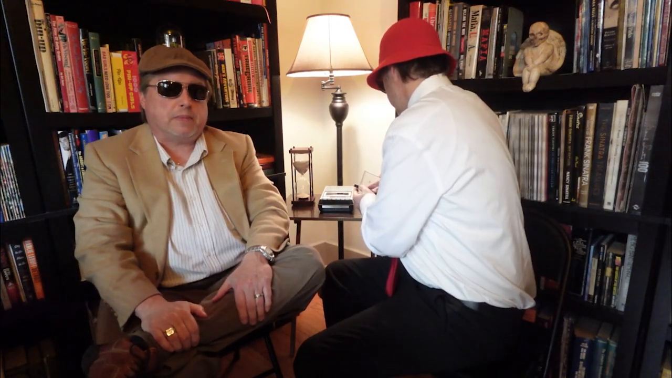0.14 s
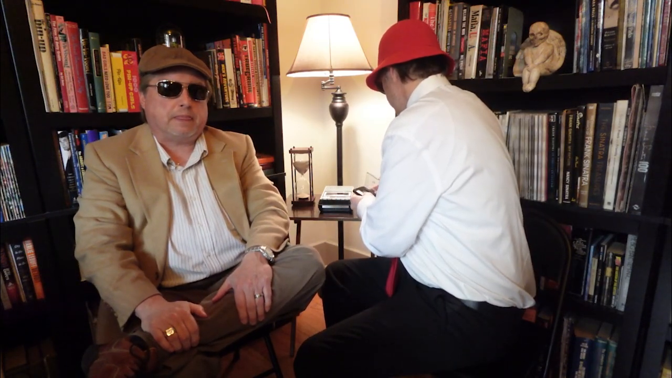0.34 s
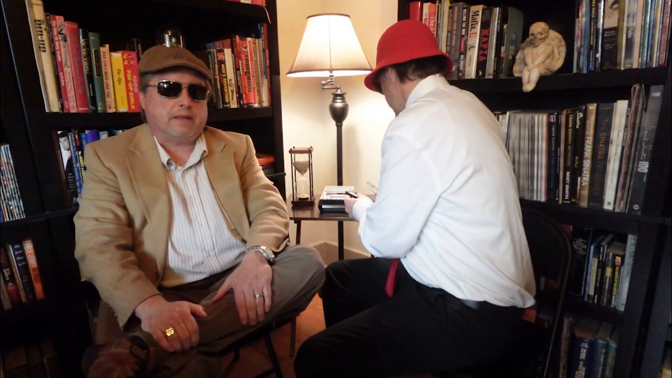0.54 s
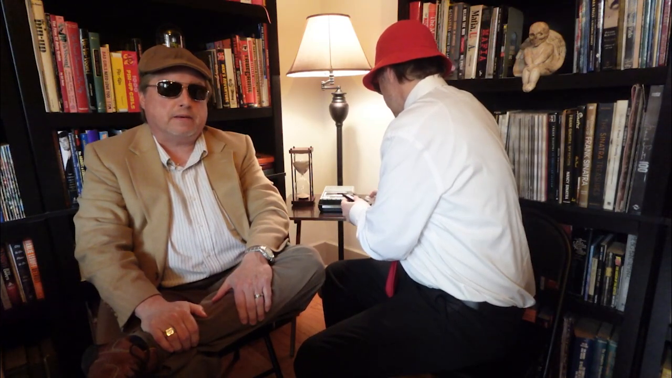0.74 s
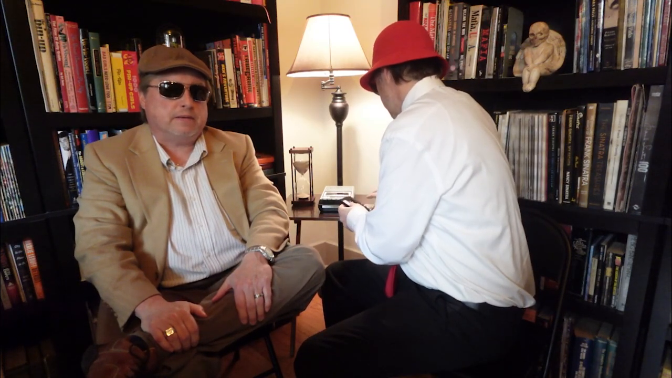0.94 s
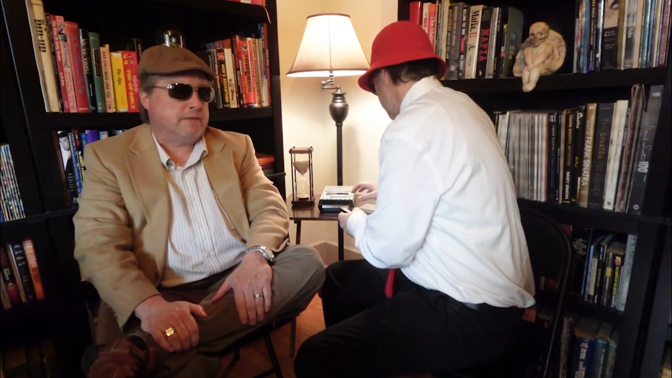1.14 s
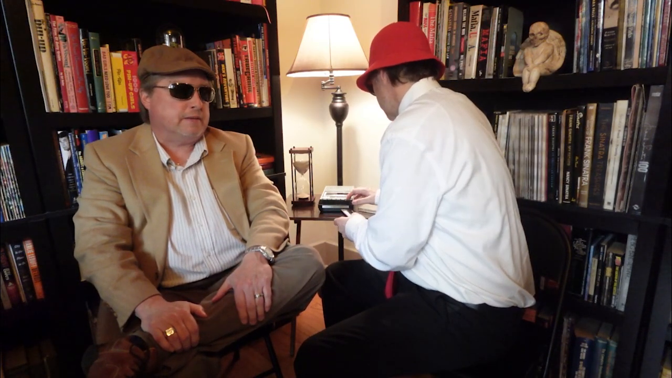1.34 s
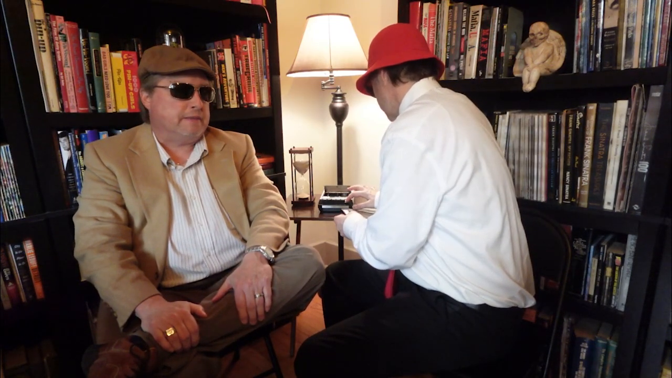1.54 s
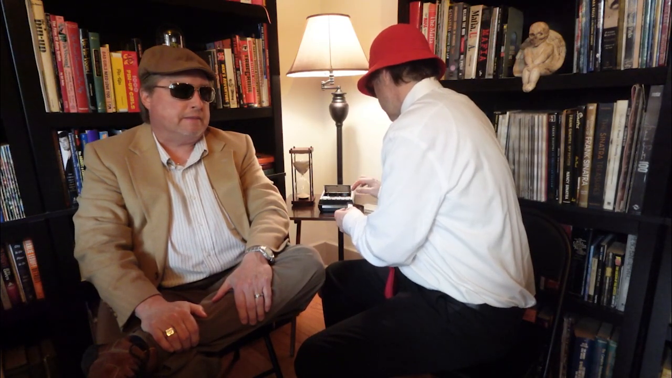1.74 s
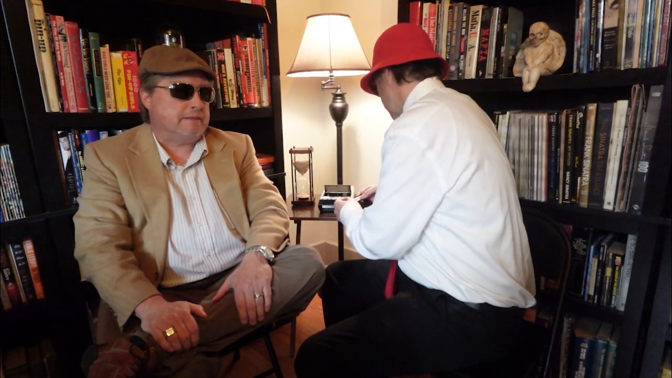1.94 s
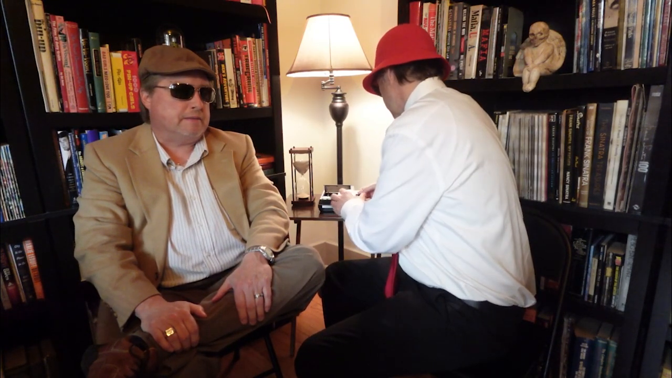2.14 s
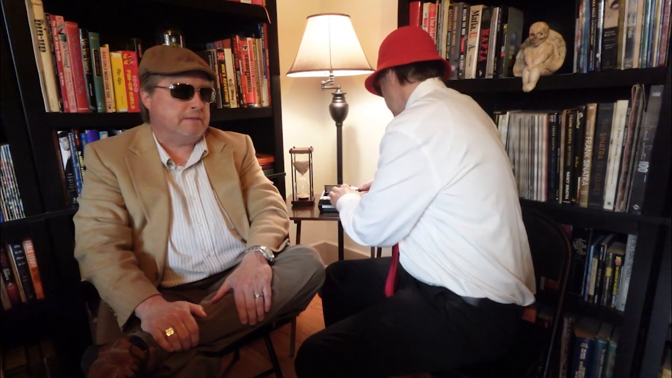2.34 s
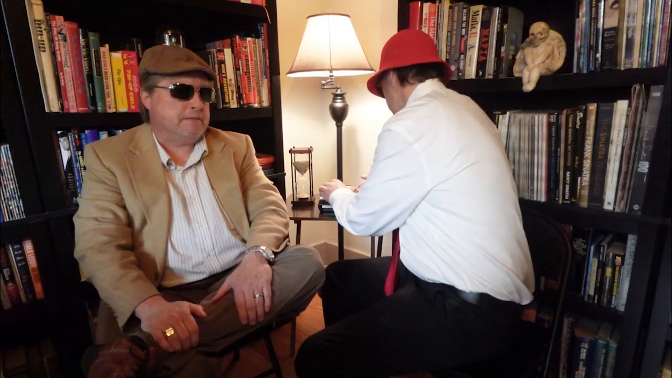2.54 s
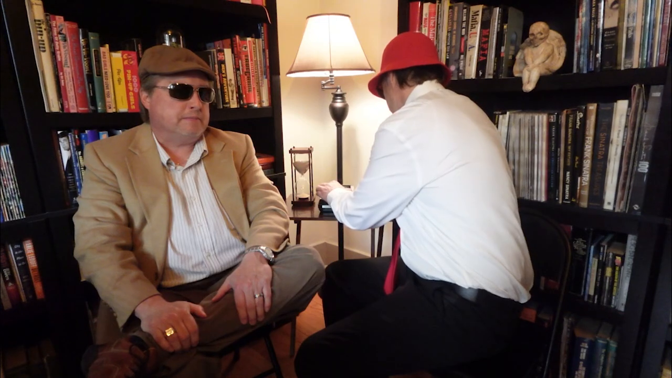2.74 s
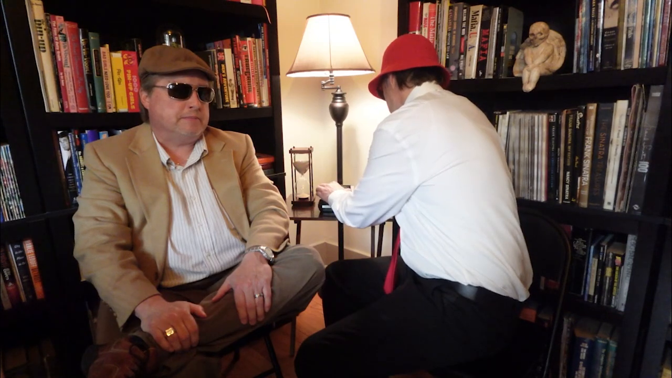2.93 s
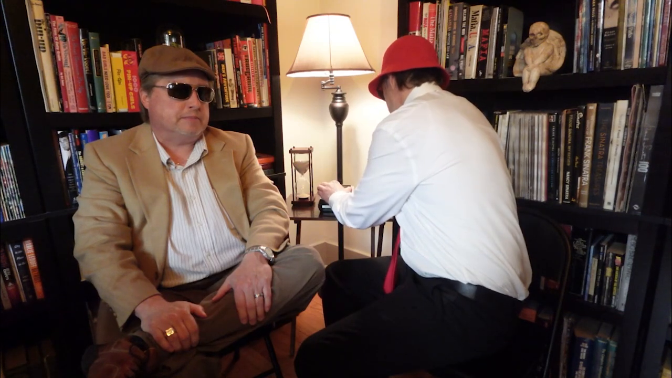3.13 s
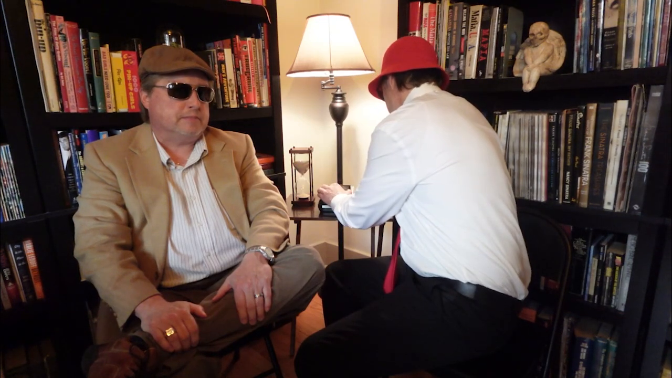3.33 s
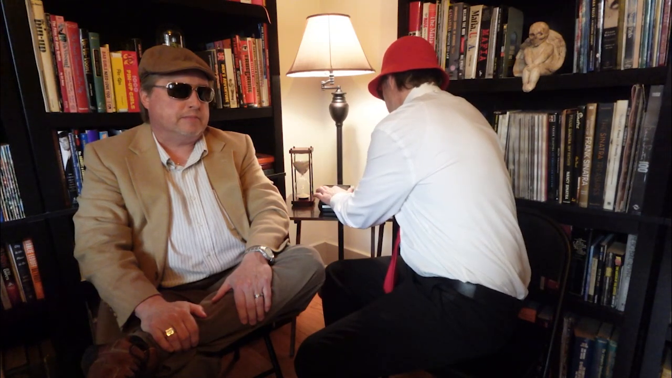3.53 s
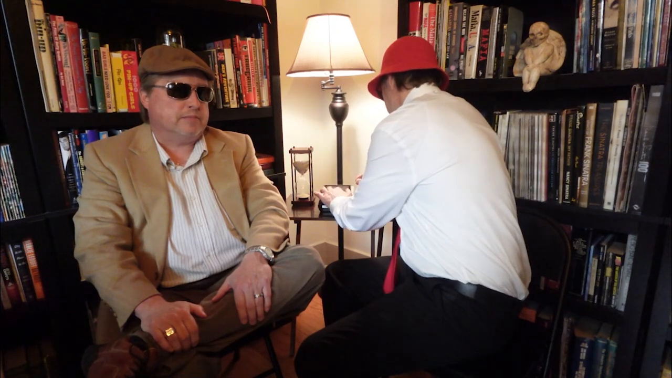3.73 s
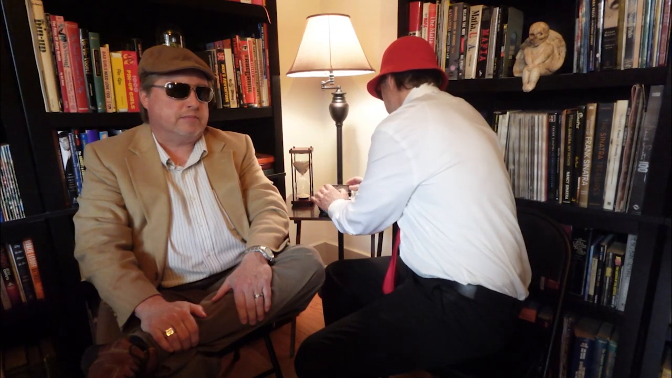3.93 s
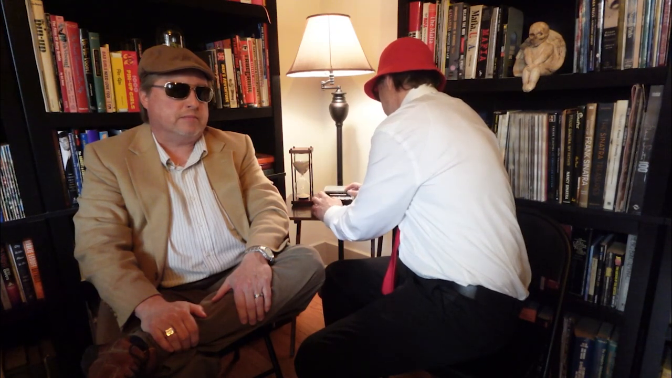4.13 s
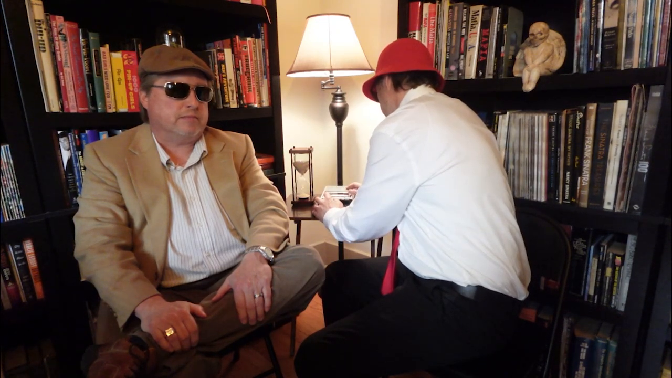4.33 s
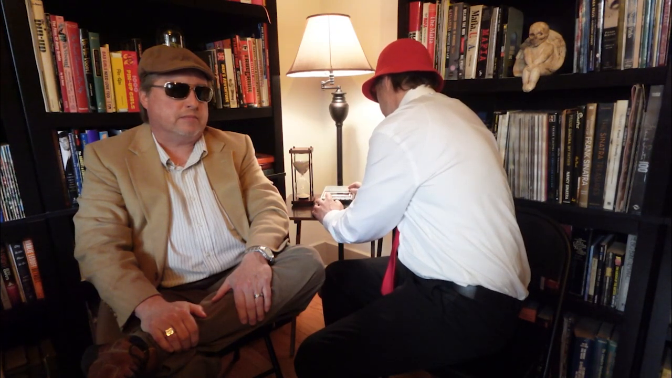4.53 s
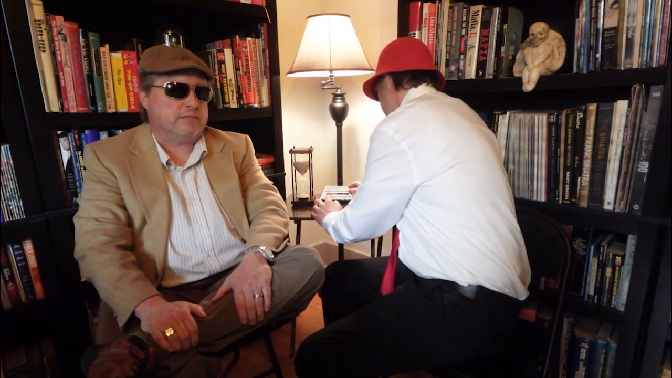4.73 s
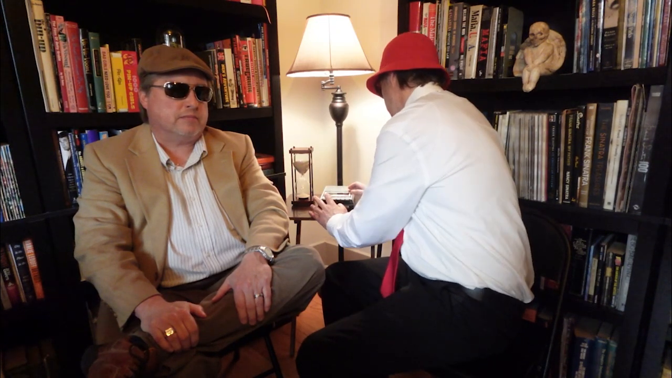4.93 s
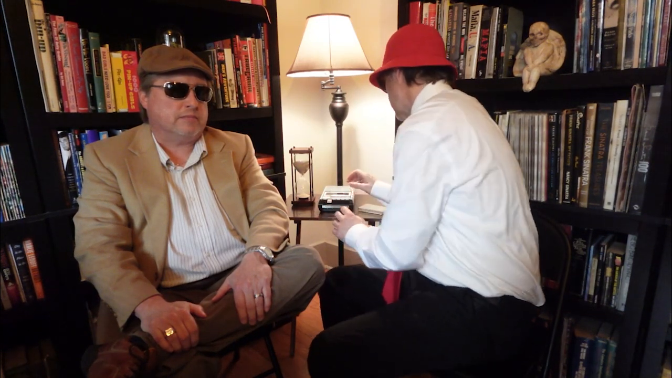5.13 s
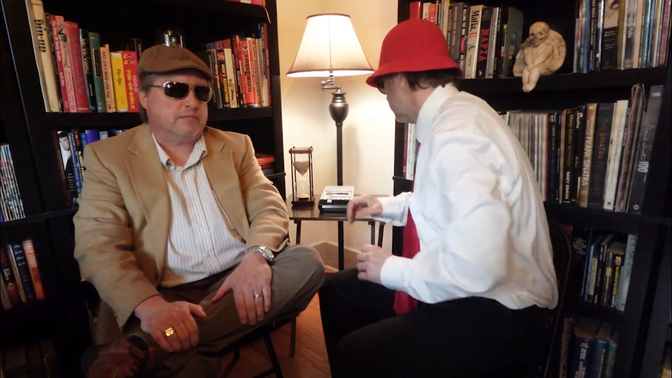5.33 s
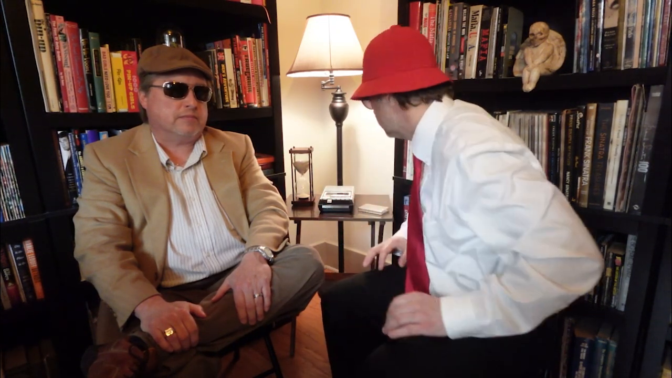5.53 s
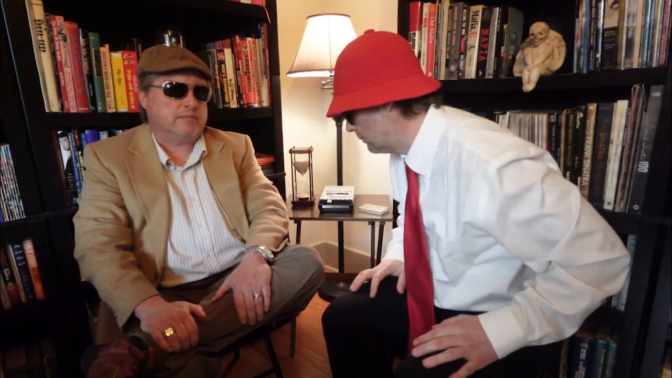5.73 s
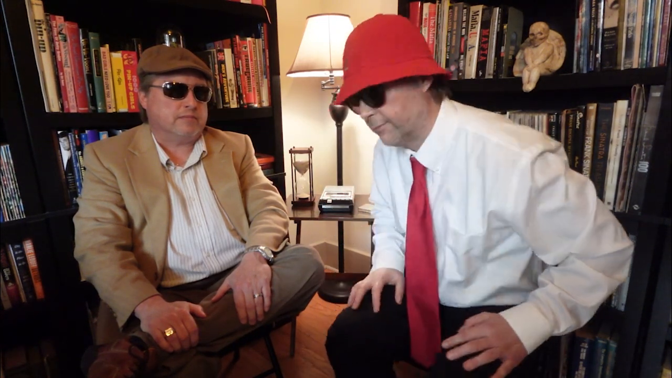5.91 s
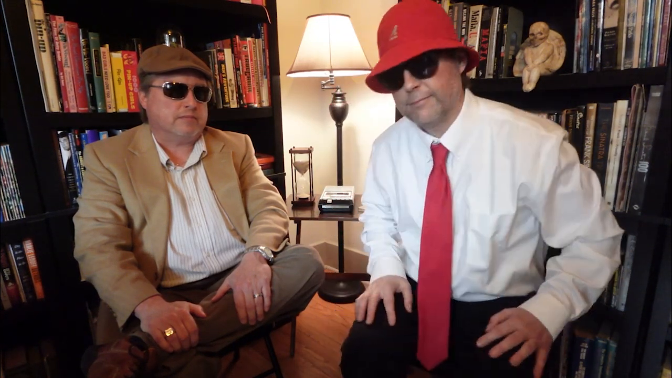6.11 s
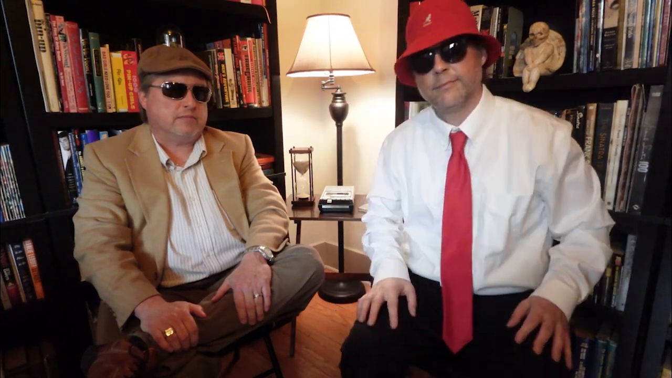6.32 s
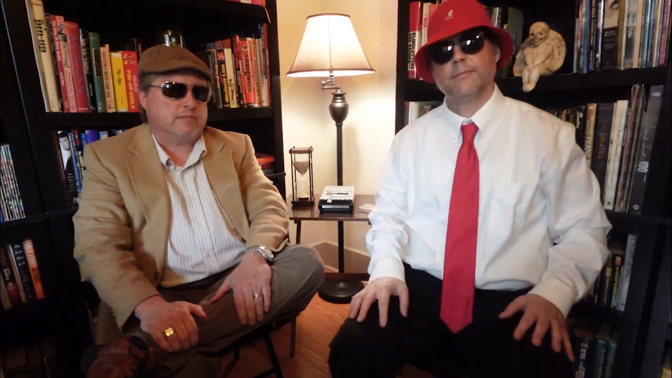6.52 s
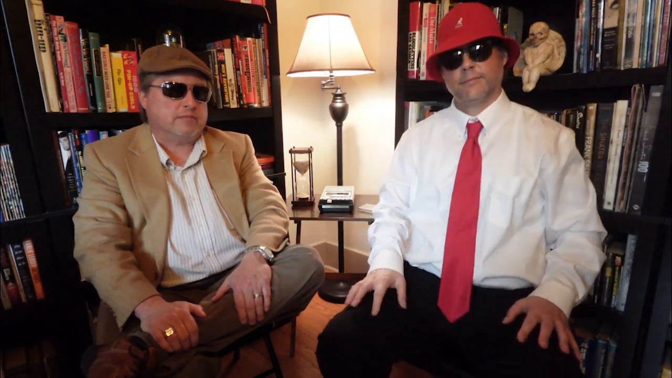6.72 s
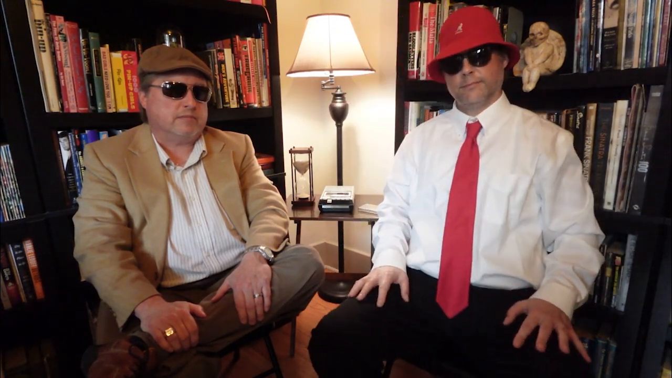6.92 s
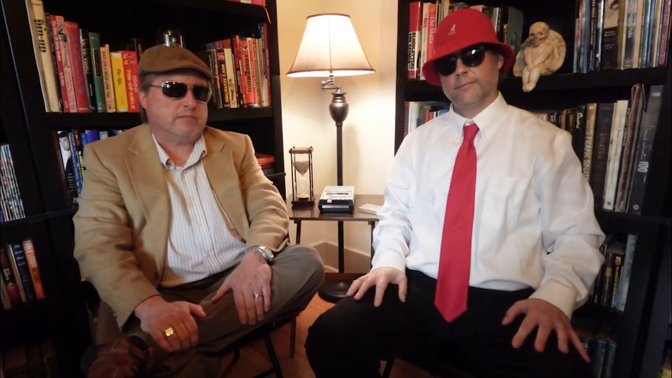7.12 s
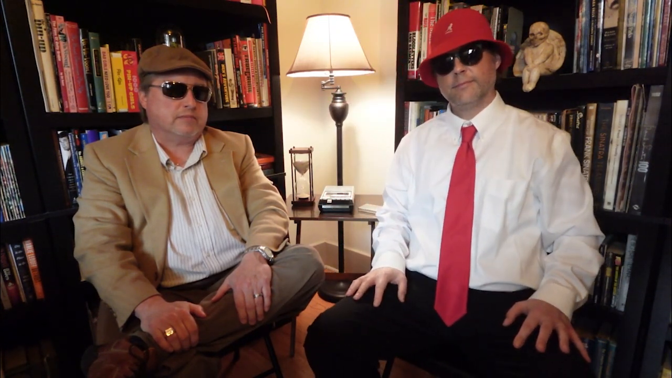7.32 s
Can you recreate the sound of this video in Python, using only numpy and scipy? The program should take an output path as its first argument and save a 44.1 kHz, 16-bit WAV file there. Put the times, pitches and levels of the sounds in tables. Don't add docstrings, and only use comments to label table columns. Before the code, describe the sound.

Sharp plastic clacks, lid snaps and a cassette rattling into a small recorder, then a soft foot thump, cloth rustle and creaking seat in a hissy room.

```python
import sys
import numpy as np
from scipy import signal
from scipy.fft import rfft, irfft, next_fast_len
from scipy.io import wavfile
from scipy.ndimage import uniform_filter1d, minimum_filter1d, map_coordinates

SR = 44100
rng = np.random.default_rng(int(sys.argv[2]) if len(sys.argv) > 2 else 0)


def store_pcm(level_fs):
    pcm = np.round(np.clip(level_fs, -1, 1) * 32767).astype(np.int16)
    wavfile.write(sys.argv[1], SR, np.atleast_2d(pcm).T)


def volts_from_decibels(level):
    exponent = np.asarray(level, float) / 20
    return 10 ** exponent


N = 324822
SPAN = 2 ** 15

# frequency in Hz, side minus mid in dB.
STEREO_WIDTH = [(60, -19), (250, -20), (700, -17), (1500, -15), (3000, -11), (6000, -9), (15000, -11)]


def unit(x):
    return x / np.sqrt(np.mean(x ** 2) + 1e-20)


def along(points, hz):
    f, v = np.transpose(points)
    return np.interp(np.log(hz + 1), np.log(f + 1), v)


def curves(rows):
    s, *columns = np.transpose(rows)
    t = np.arange(N) / SR
    return [np.interp(t, s, column, left=-120, right=-120) for column in columns]


def wobble(rate):
    knots = rng.standard_normal(int(N * rate / SR) + 4)
    return map_coordinates(knots, [np.arange(N) * rate / SR])


def filtered(x, response):
    m = next_fast_len(N + SR // 2)
    return irfft(rfft(x, m) * response(np.fft.rfftfreq(m, 1 / SR)), m)[..., :N]


def resonance(f, hz, width):
    return 1j * f * width / (hz * hz - f * f + 1j * f * width)


def body(f, modes, scatter_db=0):
    total = 0
    for k, (hz, width, db) in enumerate(modes):
        strength = volts_from_decibels(db + scatter_db * rng.standard_normal())
        total = total + (-1) ** k * strength * resonance(f, hz, width)
    return total


def spread(pair, lean_db):
    mid, side = pair
    return np.array([mid + side, mid - side]) * volts_from_decibels([[lean_db / 2], [-lean_db / 2]])


def room(f, wet_db):
    # frequency in Hz, time to fade by 60 dB in seconds.
    fade_times = [(200, 0.58), (530, 0.36), (1400, 0.3), (3700, 0.28), (10000, .3), (16000, 0.14)]
    hz, t, z = signal.stft(rng.standard_normal((2, SPAN // 2)), SR, nperseg=256)
    fading = z * volts_from_decibels(-60 * t / along(fade_times, hz)[:, None])
    tail = signal.istft(fading, SR, nperseg=256)[1][:, :SPAN // 2]
    age = np.arange(tail.shape[1]) / SR
    near = 1.11 * volts_from_decibels(-60 * age / 0.11)
    far = 0.013 * volts_from_decibels(81 * age)
    tail = tail * np.clip(age / 0.011, 0, 1) * (1 + near + far)
    wet = rfft(volts_from_decibels(wet_db) * tail / np.linalg.norm(tail[0]), SPAN)
    return np.array([1 + wet[0], volts_from_decibels(along(STEREO_WIDTH, f) - 0.5) * wet[1]])


def struck(blow, chatter, colour, wet_db):
    f = np.fft.rfftfreq(SPAN, 1 / SR)
    direct = rfft(chatter, SPAN) * [f * 0 + 1, volts_from_decibels(along(STEREO_WIDTH, f))]
    return irfft(colour(f) * (blow * room(f, wet_db) + direct), SPAN)[:, :SPAN // 2]


def echoed(x, wet_db):
    answer = irfft(room(np.fft.rfftfreq(SPAN, 1 / SR), wet_db), SPAN)[:, :SPAN // 2]
    return signal.fftconvolve(x[None], answer, axes=1)[:, :N]


def rush(spectrum, patchy_db, grain_db):
    rough = rng.standard_normal((2, N)) * volts_from_decibels(grain_db * wobble(300))
    z = signal.stft(rough, nperseg=512)[2]
    patches = uniform_filter1d(rng.standard_normal(z.shape[1:]), 6, 0)
    patches = unit(uniform_filter1d(patches, 10, 1))
    pair = signal.istft(z * volts_from_decibels(patchy_db * patches), nperseg=512)[1][:, :N]

    def tone(hz):
        return volts_from_decibels(along(spectrum, hz)) * [hz * 0 + 1, volts_from_decibels(along(STEREO_WIDTH, hz))]

    return 1.08 * unit(filtered(pair, tone))


def plastic():
    # frequency in Hz, width in Hz, level in dB.
    broad_walls = [(1074, 592, 5.5), (1313, 340, 9), (1960, 630, 0.5)]
    cavity_and_table = [(96, 23, -18.5), (233, 30, -4.5), (390, 76, -4.5), (519, 205, -3), (622, 135, -3.5),
                        (800, 150, 4)]
    thin_lid_and_ribs = [(2500, 433, 2), (3217, 232, 10), (3900, 1190, 4.5)]
    hard_edges = [(5150, 2660, 10.5), (8500, 12200, 10), (10270, 2000, 9), (13600, 27000, -50.5)]
    case_rings = [(880, 120, 3), (1150, 80, -2), (1420, 70, -1), (2720, 130, 2), (3150, 120, 0),
                  (4200, 250, -2), (6900, 350, 0)]
    recorder_rings = [(624, 56, 8.5), (940, 82, -9), (1600, 50, -3), (1860, 22, -46), (2410, 450, -12.5),
                      (9100, 100, -41), (9400, 920, 2), (10200, 48, -14)]
    case_laid_s, case_put_aside_s = 1.0, 1.3
    out = np.zeros((2, N + SPAN))
    t = np.arange(SPAN // 32) / SR
    for s, db, knock_db, thin_db, edge_db, ring_hz in contacts():
        chatter = rng.standard_normal(len(t)) * volts_from_decibels(4.8 * rng.standard_normal(len(t)) - 60 * t / 0.036)
        hollow = cavity_and_table[2 if s < case_laid_s else 0:]
        parts = [(broad_walls, 0), (hollow, knock_db + 10.5),
                 (thin_lid_and_ribs, thin_db - 2), (hard_edges, edge_db - 9.0)]
        ring_db = 14.0 - 0.67 * max(edge_db - thin_db + 11.5, 0)
        rings = case_rings if s < case_put_aside_s else recorder_rings
        rings = rings + [(ring_hz, ring_hz / 13, ring_db)]

        def colour(f):
            broad = sum(volts_from_decibels(d) * body(f, modes, scatter_db=2.0) for modes, d in parts)
            return broad * (1 + sum(volts_from_decibels(d) * resonance(f, hz, width) for hz, width, d in rings))

        sound = struck(1, 1.8 * chatter / np.linalg.norm(chatter), colour, wet_db=9)
        out[:, round(s * SR):][:, :SPAN // 2] += volts_from_decibels(db + 13.5) * sound
    return spread(out[:, :N], lean_db=-2.0)


def contacts():
    # time in seconds, peak in dB, hardness in dB, # hollow knock in dB, loudest ring in Hz.
    clacks = [(0.0024, -32.5, -13, -24, 1060), (0.367, -23.5, -2, -15, 3870),
              (0.5763, -16, -15.5, -11, 1310), (0.643, -13, -3, -17, 1420), (0.83, -6.5, -39, -13, 943),
              (0.841, -13, -13, -8, 2930), (1.0177, -14, -12, -11.5, 900), (1.4167, -32, -8, -16, 2710),
              (1.575, -11, -6.5, -28, 650), (1.7429, -16, 8, -8, 4400), (1.9674, -23, -7, -27, 1880),
              (2.2342, -37.5, -21, -16, 1570), (2.511, -35, -28, -19, 1830),
              (2.6369, -35.5, -9, -4.5, 1960), (2.9855, -35.5, 7.5, -6, 3780),
              (3.3958, -32, -10, -12.5, 1635), (3.472, -20, -22, -26, 1970), (3.484, -22, -15, -20, 2380),
              (3.806, -26, -28, -14, 1770), (3.81, -9, -1, -7.5, 1600), (4.2169, -19.5, -19, -23, 1170),
              (4.221, -14, 0, -15, 1350), (4.7422, -22, 3.5, -5, 5030), (4.7889, -31.5, -19, -4, 1230)]
    # time in seconds, peak in dB, hardness in dB,
    # loudest ring in Hz.
    ticks = [(0.176, -40, 0, 5300), (0.2204, -38, -2.5, 1290), (0.3003, -35, -14, 1290),
             (0.5058, -27.5, 7.5, 4800), (1.3732, -36.5, -3, 4150), (1.7244, -27, 7, 953),
             (2.1839, -39, 8, 5780), (2.2902, -55, -2, 1990), (3.2254, -39.5, -26, 5200),
             (4.6283, -52, -7, 3840), (4.7133, -22, -1, 4000), (4.9183, -30, 0.5, 4200)]
    thuds = [(0.6504, -25, -4, 800), (0.9874, -40, -18, 1240), (1.4734, -43, -18, 1040),
             (1.5654, -37.5, -5, 2540), (1.92, -40.5, -41, 900), (2.141, -49, -21, 854),
             (3.0494, -44.5, 1, 1110), (3.3578, -40.5, -1.5, 930), (3.5534, -23.5, 3.5, 1900),
             (4.23, -17.5, -21, 423), (3.6944, -36, -5, 1510), (4.1859, -45.5, -10, 980),
             (4.575, -50, -25, 940), (4.8266, -34, -2, 1340), (4.873, -39, -13, 574),
             (7.2684, -48, -31, 1860)]
    # start in seconds, length in seconds, peak in dB,
    # hardness in dB, loudest ring in Hz.
    rattles = [
        (0.3338, 0.15, -31, -5, 1300),
        (0.518, 0.035, -24.5, 12.5, 2700),
        (0.576, 0.061, -32, -17, 1430),
        (1.5818, 0.044, -9.5, -13, 1020),
        (1.654, 0.035, -32, -25, 1110),
        (3.415, 0.031, -40, -22, 2080),
        (3.556, .03, -11, -10.5, 1870),
        (4.233, .03, -15, -1, 1120),
        (4.264, 0.037, -13, -0.5, 1200),
    ]
    rattle_shape = [-7, -2.5, 0, -3.5]
    blows = list(clacks)
    blows += [(s, db, hard_db, -22.5, hz) for s, db, hard_db, hz in ticks]
    blows += [(s, db, hard_db, -0.5, hz) for s, db, hard_db, hz in thuds]
    for start, length, db, hard_db, hz in rattles:
        hollow_db = 6.8 + 1.26 * db
        for k in range(4):
            peak_db = db + rattle_shape[k] - rng.standard_normal()
            blows.append((start + length * k / 3, peak_db, hard_db, hollow_db, hz))
    return [(s, db, hollow_db, 1 + 0.16 * hard_db, hard_db, hz) for s, db, hard_db, hollow_db, hz in blows]


def slides():
    # start in seconds, end in seconds, level in dB, first squeak in Hz, second and weaker squeak in
    # Hz.
    drags = [
        (0.32, 0.453, -27.5, 1460, 2760),
        (0.49, 0.6, -17.5, 2690, 4500),
        (0.65, 0.757, -58, 800, 1460),
        (0.978, 1.01, -49, 3980, 900),
        (1.72, 1.76, -40.5, 8500, 4500),
        (3.403, 3.475, -30.5, 2110, 3380),
        (3.515, 3.583, -54, 2000, 9400),
        (4.691, 4.73, -38, 884, 2500),
    ]
    out = np.zeros(N)
    for start, end, db, first_hz, second_hz in drags:
        a, b = round(start * SR), round(end * SR)
        grains = rng.standard_normal(b - a) * volts_from_decibels(2.5 * wobble(250)[a:b])
        grit = np.zeros(N)
        grit[a:b] = unit(grains) * np.hanning(b - a) ** 0.45

        def squeak(f):
            return resonance(f, first_hz, first_hz / 11) - .5 * resonance(f, second_hz, second_hz / 14) + 0.011

        out += volts_from_decibels(db + 12.0) * filtered(grit, squeak)
    return spread(echoed(out, wet_db=-3), lean_db=-1.5)


def seat():
    # frequency in Hz, width in Hz, level in dB.
    upper_joint = [(1100, 220, -8), (1620, 150, -3), (2100, 180, -2), (2470, 260, 7), (3300, 300, -3),
                   (4200, 200, -5)]
    lower_joint = [(640, 130, -1), (1080, 200, 1), (1620, 170, 7), (2030, 150, 2), (3100, 300, -10)]
    # first slip in seconds, last slip in seconds, gap in seconds, peak in dB,
    # share in the lower joint from 0 to 1.
    creaks = [(2.3845, 2.465, .04, -35, .7), (2.5795, 2.638, .029, -35, .7), (5.4286, 5.43, .03, -34, .5),
              (5.6042, 5.636, .0098, -21, .45), (5.6444, 5.675, .009, -21, .9),
              (5.7154, 5.72, .02, -22, .4), (5.7364, 5.79, .0116, -23, .65),
              (5.8002, 5.868, .0111, -24, .55), (5.9135, 5.995, .0195, -22, .3),
              (6.0172, 6.02, .02, -19, .4), (6.2587, 6.33, .011, -37, .9), (6.3475, 6.52, .0245, -34, .6),
              (6.5574, 6.56, .02, -31, .3), (6.5774, 6.682, .0205, -23, .4),
              (6.6917, 6.735, .0108, -23, .5), (6.7594, 6.79, .013, -24, .65),
              (6.8044, 6.89, .0162, -24, .65)]
    jitter, scatter_db = .07, 1.3
    patter_db, patter_fade_s, shudder_s = -23.5, 0.028, .014
    slips, strain = np.zeros((2, N)), np.zeros((2, N))
    t = np.arange(N) / SR
    for first, last, gap, db, low in creaks:
        times = np.arange(first, last, gap)
        share = np.sqrt([[low], [1 - low]])
        late, *size = rng.standard_normal((len(times), 3)).T
        times_late = times + jitter * gap * late * (times > first)
        slips[:, (times_late * SR).astype(int)] += share * volts_from_decibels(db + 23.5 + scatter_db * np.array(size))
        fade_db = 20 * np.clip(t - last, 0, 1) / patter_fade_s
        strain += share * (t > first) * volts_from_decibels(db + patter_db - fade_db)
    dying = volts_from_decibels(-60 * t[None, :1000] / shudder_s)
    shudder = signal.fftconvolve(slips, dying, axes=1)[:, :N] * rng.standard_normal((2, N))
    slips = .6 * slips + .15 * shudder
    tiny_slips = (rng.random(N) < 300 / SR) * rng.standard_normal(N)
    patter = unit(tiny_slips * volts_from_decibels(2.7 * wobble(48)))

    def joints(f):
        return np.array([body(f, lower_joint), body(f, upper_joint)]) + .007

    creak = filtered(slips + strain * patter, joints).sum(axis=0)
    return spread(echoed(creak, wet_db=-6), lean_db=-2.4)


def heel():
    # time in seconds, level in dB.
    steps = [
        (5.072, -30),
        (5.235, -51),
        (5.29, -63),
    ]
    # frequency in Hz, width in Hz, level in dB.
    boards = [(222, 42, -15), (370, 43, 9), (480, 87, 8), (644, 126, 5.5), (900, 200, -4), (1170, 100, -5),
              (2000, 720, -13)]
    out = np.zeros((2, N + SPAN))
    for s, db in steps:
        thump = struck(1, [0.], lambda f: body(f, boards), wet_db=6)
        out[:, round(s * SR):][:, :SPAN // 2] += volts_from_decibels(db + 36.5) * thump
    return spread(out[:, :N], lean_db=-1.0)


def cloth():
    # frequency in Hz, level in dB per Hz.
    rub_tone = [(180, -16), (300, -6), (377, -10), (460, -6), (656, -2.5), (1140, 2.5), (3180, -3.5),
                (9000, -17.5), (11700, -46), (19800, -120)]
    swish_tone = [(1500, -17), (3000, -3.5), (5000, -6), (8000, -12), (12000, -16), (16000, -22.5)]
    weight_tone = [(25, -28), (80, -44), (200, -5), (330, -4), (600, -47)]
    rub, swish, weight = motion()
    stir = volts_from_decibels(.7 * wobble(12))
    rub = rub * stir * volts_from_decibels(.8) * rush(rub_tone, patchy_db=1.2, grain_db=1.5)
    swish = swish * stir * volts_from_decibels(-1.5) * rush(swish_tone, patchy_db=.7, grain_db=.8)
    weight = weight * rush(weight_tone, patchy_db=3.5, grain_db=2)
    return spread(rub + swish + weight, lean_db=-2.5)


def motion():
    # start in seconds, peak in seconds, end in seconds, effort in dB,
    # sliding speed in dB.
    arm_moves = [
        (0.0, 0.03, 0.17, -62.5, 9.5),
        (1.05, 1.122, 1.45, -62, 5),
        (1.4, 1.48, 1.56, -50.5, -9),
        (1.914, 2.026, 2.1, -54.5, 8),
        (2.096, 2.24, 3.3, -56, 3),
        (2.374, 2.616, 2.91, -57, -3.5),
        (4.378, 4.414, 4.48, -48.5, -8),
    ]
    # time in seconds, effort in dB, sliding speed in dB.
    turning = [
        (4.9, -61, -8),
        (5.16, -51, 3),
        (5.32, -50, 5.5),
        (5.56, -48, 3.5),
        (5.7, -44, 1.5),
        (5.8, -40.5, -4.5),
        (5.98, -43, 4),
        (6.13, -50.5, 9),
        (6.19, -52.5, 6),
    ]
    # time in seconds, effort in dB, sliding speed in dB.
    settling = [
        (6.19, -51, -1),
        (6.41, -50, -5),
        (6.55, -44.5, -14),
        (6.7, -38.5, -9),
        (6.76, -41, -5),
        (7.05, -53.5, -5),
        (7.18, -66, -12),
        (7.37, -64, -15),
    ]
    moves = [turning, settling]
    for start, peak, end, db, speed in arm_moves:
        moves.append([(start, db - 13.5, speed), (peak, db, speed), (end, db - 13.5, speed)])
    gains = 0
    for rows in moves:
        effort, speed = curves(rows)
        weight_db = -64 + 0.93 * (effort + 43.5)
        gains = gains + volts_from_decibels([effort, effort + speed, weight_db])
    return gains


def hush():
    # frequency in Hz, level in dB per Hz.
    hush_tone = [(15, -78), (25, -32), (217, -10), (463, -5), (659, 1.5), (734, -4.5), (1100, 0),
                 (5280, -9), (14800, -16.5), (16000, -13)]
    steady = rush(hush_tone, patchy_db=.6, grain_db=1)
    return spread(volts_from_decibels(-59.0) * steady, lean_db=.5)


def scene():
    return plastic() + slides() + seat() + heel() + cloth() + hush()


def top_cut(x):
    return signal.sosfilt(signal.butter(12, 16950, fs=SR, output="sos"), x)


def record(dry):
    bass_hz, top_hz = 520, 16000
    x = filtered(dry, lambda hz: 1j * hz / (bass_hz + 1j * hz) * (hz < top_hz))
    need = np.minimum(1, volts_from_decibels(-2.5) / (np.abs(x).max(axis=0) + 1e-9))
    gain = uniform_filter1d(minimum_filter1d(need, size=441), size=221)
    return top_cut(x * gain)


dry = scene()
out = record(dry)
store_pcm(out)
```